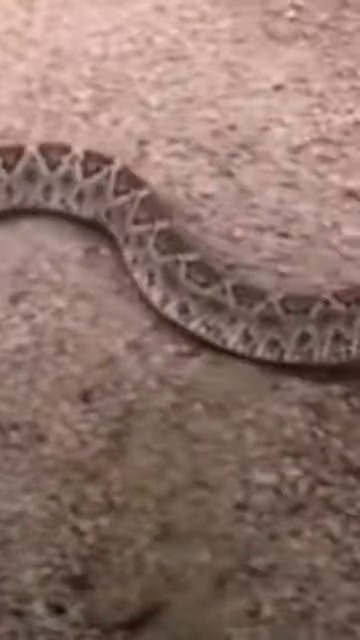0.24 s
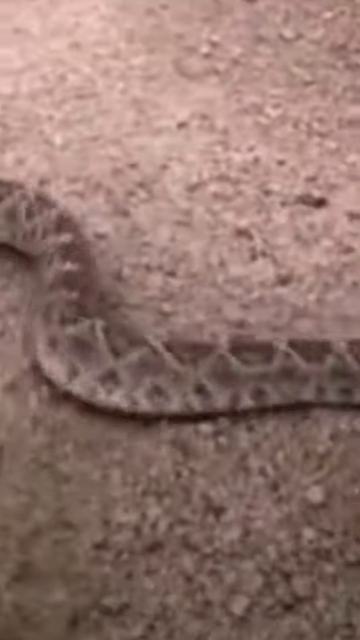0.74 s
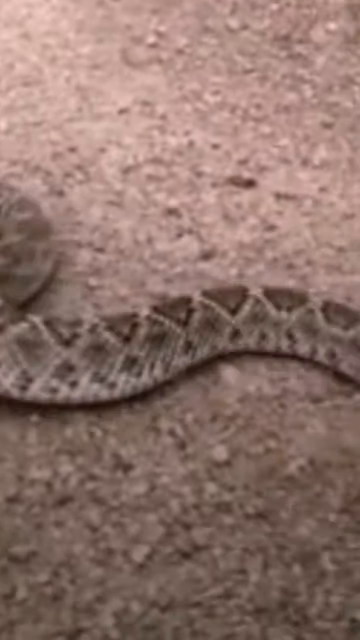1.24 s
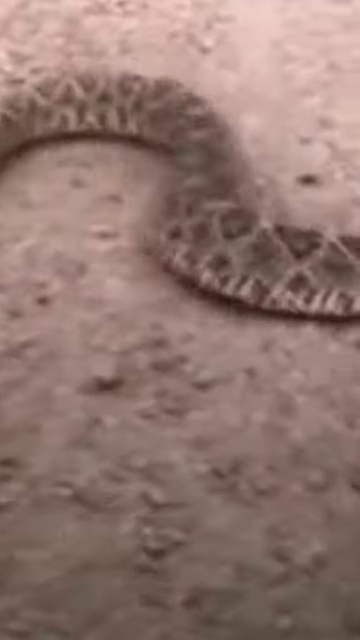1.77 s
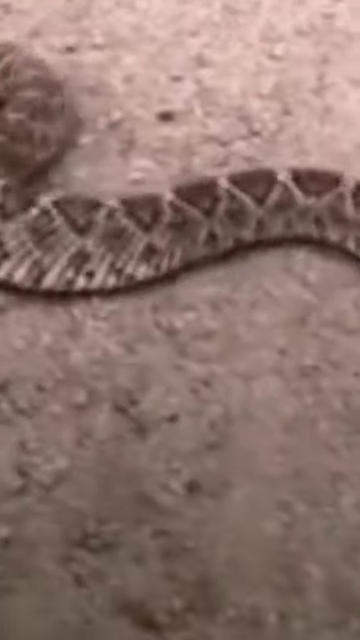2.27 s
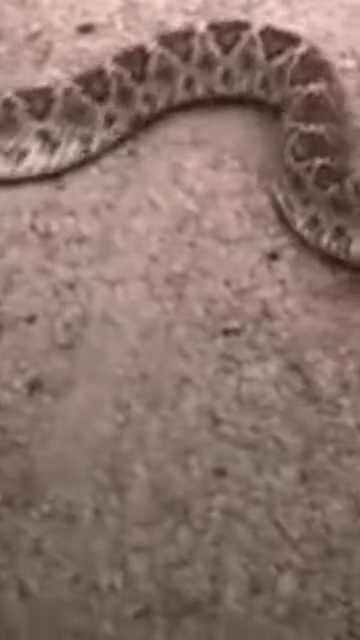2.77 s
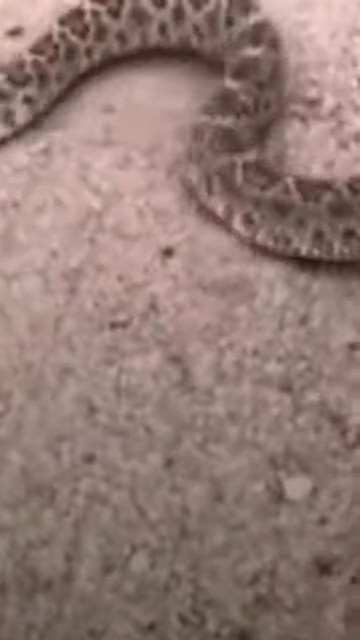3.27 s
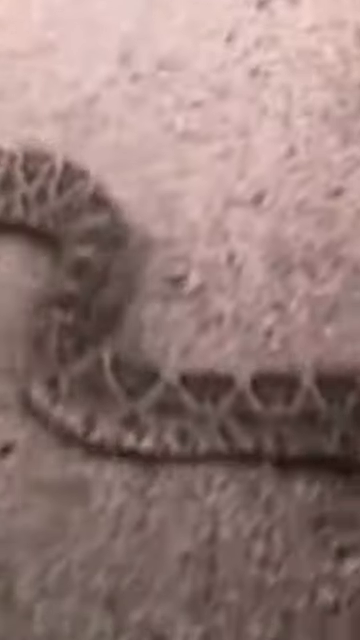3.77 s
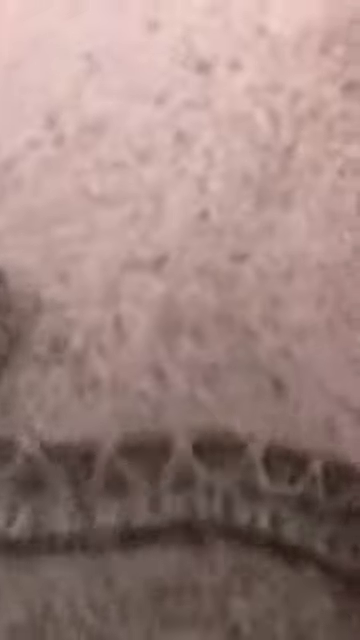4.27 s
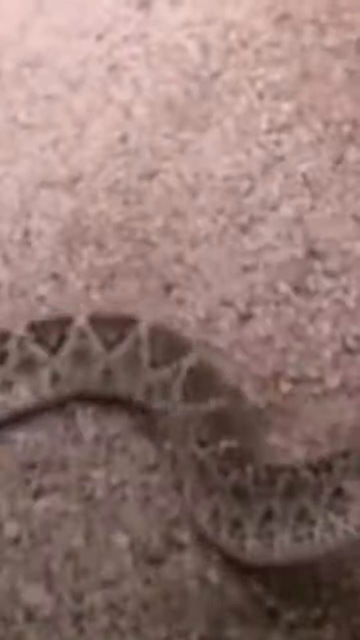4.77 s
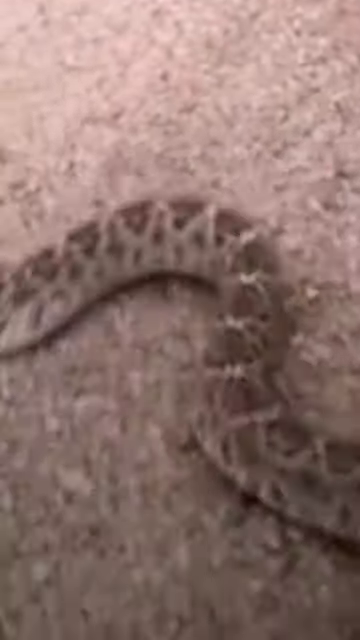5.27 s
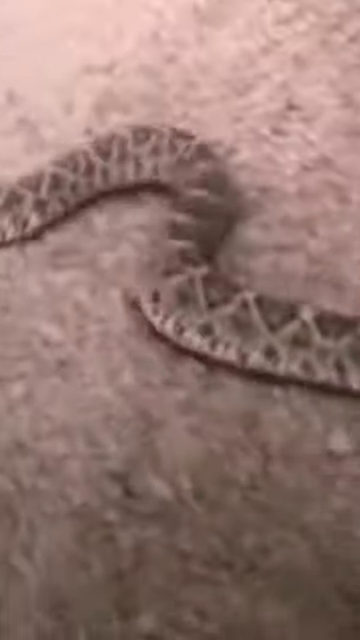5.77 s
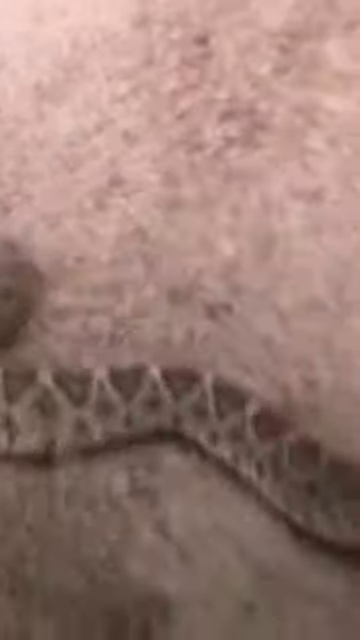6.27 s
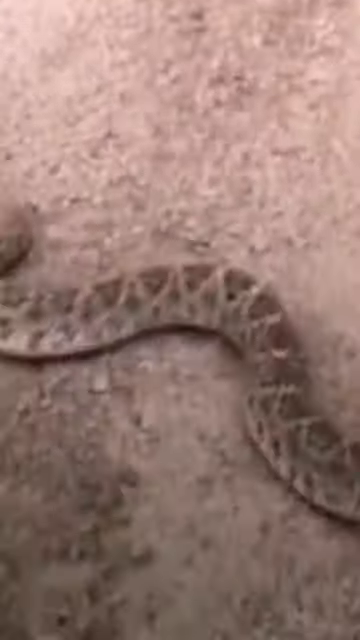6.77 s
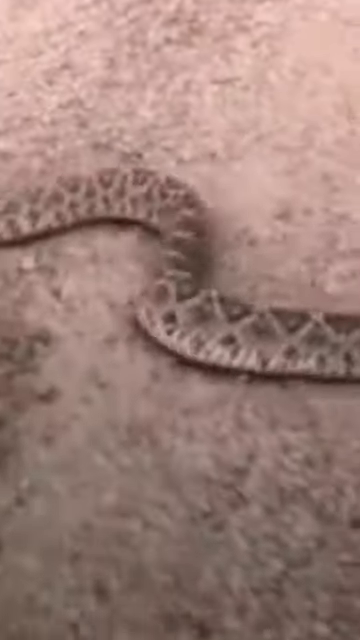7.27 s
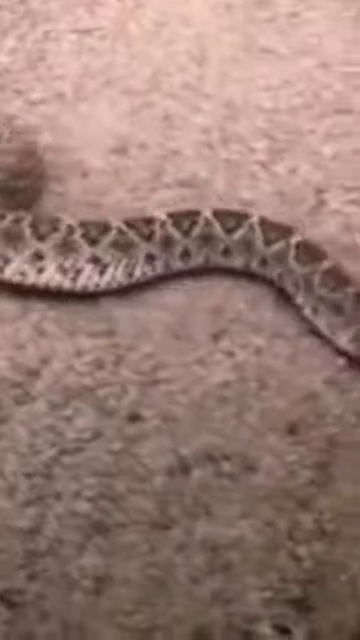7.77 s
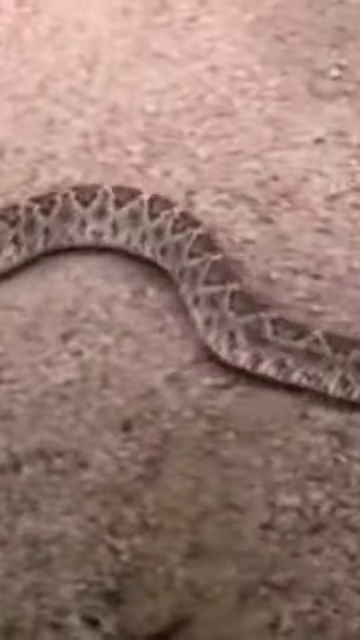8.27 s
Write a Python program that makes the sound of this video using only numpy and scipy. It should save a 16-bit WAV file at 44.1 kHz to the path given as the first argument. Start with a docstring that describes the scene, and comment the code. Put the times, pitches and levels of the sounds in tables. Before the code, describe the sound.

Outdoors on dry dirt, a bright, rapid rattlesnake buzz dominates from the first instant, its tone shifting as the tail turns. Beneath are lumpy wind rumble, a quiet low engine throb, soft scuffing and irregular gritty crunches with tiny stone ticks. Two hard cuts leave brief silences; the buzz is stronger between them. Near the end the opening sound repeats. Close, dry, centred sound, with wind thumping the microphone.

```python
"""A rattlesnake crawls over a dirt track: from the start its rattle buzzes, as loose horny segments
clash in bursts twice a swing and ring their hollow shells, modelled as clicks through resonances.
Behind it, filtered noise makes the wind and harmonics of the crank speed an idling engine; soon come
gravel crunches (dense clicks) and pebble knocks (decaying sines).
All sound cuts out near 1.7 s and 5.4 s, and from 7.6 s the opening sounds again like a loop."""
import sys
import numpy as np
from scipy import signal
from scipy.fft import rfft, irfft, next_fast_len
from scipy.io import wavfile
from scipy.ndimage import uniform_filter1d

SR = 44100
rng = np.random.default_rng(int(sys.argv[2]) if len(sys.argv) > 2 else 0)


def store_wav(level_fs):
    """Save 16-bit WAV to argv[1]."""
    pcm = np.round(np.clip(np.atleast_2d(level_fs), -1, 1) * 32767)
    wavfile.write(sys.argv[1], SR, pcm.T.astype(np.int16))


N = 375732
TIME = np.arange(N) / SR
EDGE_HZ = 15550  # upper band limit


def gain_of(db):
    """Logarithmic level: decibels to amplitude ratio."""
    return 10 ** (np.asarray(db) / 20)


def evened(x):
    """Power normalisation: scales to rms 1."""
    return x / np.sqrt(np.mean(x ** 2) + 1e-20)


def played(rows):
    """Linear interpolation: the columns of a (time, ...) table at every sample."""
    s, *columns = np.transpose(rows)
    return [np.interp(TIME, s, column) for column in columns]


def filtered(x, gain):
    """Zero-phase filtering: multiplies the spectrum by a gain that is a function of frequency."""
    size = next_fast_len(N + 4096)
    return irfft(rfft(x, size) * gain(np.fft.rfftfreq(size, 1 / SR)), size)[:N]


def coloured(x, points):
    """Spectral shaping: applies (frequency, dB) points on a log frequency axis, then evens to rms 1."""
    hz, db = np.transpose(points)
    return evened(filtered(x, lambda f: gain_of(np.interp(np.log(f + 1), np.log(hz), db))))


def band(x, lo_hz, hi_hz):
    """Band-pass filtering with steep tanh edges."""
    return filtered(x, lambda f: (np.tanh((f - lo_hz) / 70) - np.tanh((f - hi_hz) / 70)) / 2)


def drift(rate_hz):
    """Random modulation: noise under a Gaussian low-pass, at rms 1."""
    return evened(filtered(rng.standard_normal(N), lambda f: np.exp(-(f / rate_hz) ** 2)))


def clicks(per_s, spread_db):
    """Random impulse process: clicks of chance timing, sign and size."""
    hit = rng.random(N) < per_s / SR
    sign = rng.choice([-1., 1.], N)
    size_db = spread_db * np.clip(rng.standard_normal(N), -2.5, 2.5)
    return hit * sign * gain_of(size_db)


def resonances(x, modes):
    """Modal resonance: passes x through (frequency, width, dB) peaks with steep skirts."""
    def gain(f):
        power = sum(gain_of(db) ** 2 / (1 + 2 * ((f - hz) / width) ** 2) ** 3 for hz, width, db in modes)
        return np.sqrt(power)
    return filtered(x, gain)


def swept(x, gain):
    """Time-varying filtering: applies a gain that is a function of frequency and sample number."""
    hz, s, z = signal.stft(x, SR, nperseg=1024, noverlap=768)
    at = np.minimum(s * SR, N - 1).astype(int)
    return signal.istft(z * gain(hz[:, None], at), nperseg=1024, noverlap=768)[1][:N]


def shimmer(x, depth_db, width_hz, hold_s):
    """Spectral modulation: narrow dips come and go, shallower at 4.1-5.7 kHz and shallowest on top."""
    hz, _, z = signal.stft(x, SR, nperseg=2048, noverlap=1536)
    patches = rng.standard_normal(z.shape)
    spans = [max(1, round(width_hz * 2048 / SR)), max(1, round(hold_s * SR / 512))]
    for axis, span in enumerate(spans):
        for _ in range(2):
            patches = uniform_filter1d(patches, span, axis)
    depth_share = np.interp(hz, [3700, 4100, 5700, 6200, 8000, 11500], [1, .6, .6, 1, 1, .15])
    # rises are capped, so the dips stand out
    gain = gain_of(depth_db * depth_share[:, None] * np.minimum(evened(patches), .7))
    # even out the gain over a wider stretch of frequency
    gain /= np.sqrt(uniform_filter1d(gain ** 2, 10 * spans[0], axis=0))
    return signal.istft(z * gain, nperseg=2048, noverlap=1536)[1][:N]


# notches in the buzz: (centre before wander [Hz], width before widening [Hz])
NOTCHES = [(3520, 224), (4950, 120), (6450, 150), (7500, 100)]
WANDER_HZ, WANDER_RATE_HZ, WIDEN_DB = 114, 2.85, 6  # rms wander, its bandwidth, rms widening


def notches(hz, at):
    """Moving spectral notches: dips in the buzz that wander, widen and narrow at random."""
    gain = 1
    for centre, width in NOTCHES:
        offset = hz - centre - WANDER_HZ * drift(WANDER_RATE_HZ)[at]
        half_width = width * gain_of(WIDEN_DB * drift(WANDER_RATE_HZ)[at]) / 2
        gain = gain * offset ** 2 / (offset ** 2 + half_width ** 2)
    return gain


# the rattle as the tail turns, before RATTLE_DB: (time [s], sizzle level [dB],
# main ring against the sizzle [dB], second ring against the sizzle [dB])
RATTLE = [(0.02, -39.5, -1, 1), (0.17, -40.5, -4, 6.5), (0.45, -40, 1, -2), (0.75, -37.5, -0.5, -2.0),
          (0.97, -38.5, -2, -3.5), (1.15, -39, 5.5, 0.5), (1.55, -37.5, 1, -1.5), (2.1, -34.5, -2, 1.5),
          (2.5, -35, 1.0, -1.5), (2.85, -37, -2, 2.5), (3.25, -34, 0.5, -2), (3.75, -34, 0, -6.5),
          (4.4, -34, 3.0, 1), (5.1, -37.0, -1.5, 2), (5.36, -37, -0.5, 8), (5.6, -36, 1.5, 2),
          (5.87, -36, 5.5, -2.5), (6.15, -37.5, -1, -1.0), (6.45, -38.5, -2.5, 4.5),
          (7.0, -37.5, -0.5, -0.5), (7.2, -39, 5, -0.5), (7.6, -40.5, 0, 3.5)]
# level of the buzz between 6.3 and 8.9 kHz against the sizzle; it drops out briefly once: (time [s], level
# [dB])
UPPER = [(0.15, -5), (.45, -7), (2.3, -0.5), (3.05, -5), (3.3, -32), (3.55, -74), (3.75, -17), (3.9, -2),
         (5.3, 2.5), (5.9, -3.5), (6.5, 1.5), (7.5, -3.5)]
# hollow segments as resonators: (frequency [Hz], width [Hz], level [dB])
SHELL = [(2875, 606, -4.5), (4325, 1180, 1.5), (5397, 850, 7), (6740, 1620, 6.5), (8110, 1230, 1),
         (9520, 620, -11.5), (10270, 560, -8), (10670, 300, -6), (11920, 2400, -12), (15000, 3100, -11)]
# edges between the low, main, second and upper rings and the sizzle: (frequency [Hz])
RING_EDGES_HZ = [3600, 4950, 6300, 8900]
# the main ring slides a little as the segments shift: (time [s], offset [Hz])
SLIDE = [(2.3, -0.5), (3.2, 239), (3.8, 68), (4.4, -110), (5.8, -67), (6.6, 2)]
# the swing rate at the usual level; it falls a little as the level rises
SWINGS_PER_S, SWINGS_PER_DB, USUAL_DB = 71.8, -0.4, -38
TOGETHER = 0.078  # how closely the segments clash together, 0-1
RATTLE_DB, LOW_RING_SHARE = -0.5, 0.26


def rattle():
    """Impact excitation of resonators: two clash bursts a swing, one stronger, ring the hollow shells."""
    level_db, main_db, second_db = played(RATTLE)
    rings_db = main_db, second_db, played(UPPER)[0]
    swings = SWINGS_PER_S + SWINGS_PER_DB * (level_db - USUAL_DB)
    angle = 2 * np.pi * np.cumsum(swings * (1 + 0.015 * drift(12))) / SR
    stroke = np.cos(2 * angle) + 0.4 * np.cos(angle) + 0.45 * np.sin(4 * angle)
    force = np.exp(TOGETHER * stroke)
    clashes = shimmer(clicks(17000, spread_db=3.5), depth_db=12.5, width_hz=43, hold_s=0.13) * force
    ring = resonances(swept(clashes, notches), SHELL)

    # the sizzle follows the level alone; the lowest ring gives way when the second one swells
    sizzle = band(ring, RING_EDGES_HZ[-1], EDGE_HZ)
    low = gain_of(-LOW_RING_SHARE * second_db) * (ring - band(ring, RING_EDGES_HZ[0], SR))
    main, second, upper = (
        gain_of(db) * evened(band(ring, lo, hi))
        for lo, hi, db in zip(RING_EDGES_HZ, RING_EDGES_HZ[1:], rings_db))

    # single-sideband shift of the main ring
    slide = np.exp(2j * np.pi * np.cumsum(played(SLIDE)[0]) / SR)
    main = (signal.hilbert(main, next_fast_len(N))[:N] * slide).real
    return gain_of(level_db + RATTLE_DB) * ((low + sizzle) / sizzle.std() + main + second + upper)


# wind rumble at the microphone, before trim and drift: (time [s], level [dB])
WIND = [(0, -34.5), (.65, -32), (.85, -50), (1.5, -32.5), (2.05, -40), (2.3, -35), (2.85, -30), (3.1, -30),
        (3.65, -33.5), (3.9, -36.5), (5.75, -38.5), (6.15, -31.5), (6.9, -33), (7.6, -32)]
# spectrum of the rumble: (frequency [Hz], relative density [dB per Hz])
RUMBLE = [(18, -39.5), (29, -7.5), (38, -12.5), (48, 5.5), (100, 4.5), (145, -5), (200, -15.5), (400, -59)]
# rush of the gusts above the rumble, before trim and drift: (time [s], level [dB])
RUSH = [(0, -50.5), (2.1, -53.5), (2.2, -38), (2.9, -38.5), (3.07, -31), (3.68, -40), (3.85, -44),
        (5.35, -40.5), (6.15, -44), (6.5, -48.5), (7.6, -50)]
# spectrum of the gusts, before the moving edge: (frequency [Hz], relative density [dB per Hz])
GUST = [(70, -30), (115, 10), (180, 7.5), (270, -1.5), (550, -11.5)]
# upper edge of the rush: (time [s], frequency [Hz])
RUSH_EDGE = [(1.6, 400), (2.1, 287.7), (2.35, 383), (2.8, 318), (3.7, 588), (5.3, 576), (5.9, 377)]
# single buffets of air: (time [s], envelope peak [dB], pitch [Hz])
BUFFETS = [(.708, -18, 85), (3.06, -15, 60), (3.247, -18, 85), (4.889, -21.5, 85), (6.70, -15, 65),
           (6.931, -16, 62), (7.365, -19, 60)]


def wind():
    """Turbulent pressure noise: a lumpy rumble, the rush of gusts above it, and short buffets."""
    rumble_gain = gain_of(played(WIND)[0] - 1.5 + 2.6 * drift(23))
    rumble = rumble_gain * coloured(rng.standard_normal(N), RUMBLE)

    edge_hz = played(RUSH_EDGE)[0]
    gusts = coloured(rng.standard_normal(N), GUST)
    gusts = swept(gusts, lambda hz, at: 1 / np.hypot(1, (hz / edge_hz[at]) ** 14))
    rush = gain_of(played(RUSH)[0] + 7.0 + 3.3 * drift(22)) * gusts

    buffets = np.zeros(N)
    for s, db, hz in BUFFETS:
        envelope = gain_of(db - ((TIME - s) / 0.0031) ** 2)
        buffets += envelope * np.sin(2 * np.pi * (hz * TIME + rng.random()))
    return rumble + rush + buffets


# stretches of sound: (start [s], end [s], fade-in [s], time of one engine beat [s])
BOUTS = [(0, 1.655, .004, 1.151), (1.985, 5.407, .015, 3.059), (5.558, 8.53, .003, 6.696)]
# throb of the idling engine: (multiple of the crank speed, rms level before drift and ENGINE [dB])
IDLE = [(3, -49.5), (4, -37), (5, -41), (6, -49)]
# hum of the engine: (frequency [Hz], rms level before drift and ENGINE [dB])
HUM = [(161.3, -47), (167.5, -49)]
# drone of the engine's body: (frequency [Hz], width [Hz], relative level [dB])
DRONE = [(173.8, 22.8, 2.5), (307, 109, -9), (506, 135, -15)]
# the engine fades away for a while: (time [s], throb gain [dB], hum and drone gain [dB])
ENGINE = [(1.6, -2, 2.5), (2.05, -13, -7), (3.4, -5, -9), (3.7, -6.5, 4.5), (5.7, -5, 2), (6.25, 1, 2)]
CRANK_HZ = 16.1


def engine():
    """Harmonic superposition: crank orders align once a turn, under a wavering hum and a body drone."""
    starts, _, _, beats = np.transpose(BOUTS)
    beat = beats[np.searchsorted(starts, TIME, "right") - 1]
    angle = 2 * np.pi * CRANK_HZ * (TIME - beat)
    throb = sum(gain_of(db + 2 * drift(5)) * np.cos(k * angle) for k, db in IDLE)
    hum = np.zeros(N)
    for hz, db in HUM:
        hum += gain_of(db + 2 * drift(4.6)) * np.sin(2 * np.pi * hz * TIME + .5 * drift(1.9))
    drone = gain_of(-43.5) * evened(resonances(rng.standard_normal(N), DRONE))
    throb_db, hum_db = played(ENGINE)
    # sqrt(2) turns rms into sine amplitude
    return np.sqrt(2) * gain_of(throb_db) * throb + gain_of(hum_db) * (np.sqrt(2) * hum + drone)


# gravel crunches: (time [s], peak before CRUNCH_DB [dB], weight of the thud before THUD_DB [dB],
# decay time [s])
CRUNCHES = [(0.099, -38.5, -8, 0.0034), (0.298, -32.5, -9, 0.008), (0.415, -32, -18, 0.0062),
            (0.659, -41, -1, 0.005), (0.92, -31, -10, 0.0087), (1.21, -40, 5, 0.0057),
            (1.379, -36.5, -3, 0.0044), (2.155, -31.5, -15, 0.011), (2.277, -30, -11, 0.011),
            (2.913, -33.5, -32, 0.015), (2.993, -31.5, -4, 0.005), (3.314, -31, -20, 0.0067),
            (3.706, -28, -24, 0.0084), (3.749, -32.5, -25, 0.013), (4.811, -38, -14, .005),
            (5.006, -37, 0, 0.0039), (5.044, -36, -3, 0.0052), (5.601, -30.5, -19, 0.016),
            (5.789, -29, -14, 0.01), (5.812, -33, 2.5, 0.0069), (6.132, -33.5, -10, 0.011),
            (6.191, -29.5, -5, 0.0095), (6.393, -28.5, -33, 0.025), (6.752, -29, -36, 0.0059)]
# spectrum of the grains: (frequency [Hz], relative density [dB per Hz])
GRAVEL = [(200, -26), (500, -12.5), (900, -3.5), (1300, -1.5), (1900, 1), (2500, -4.5), (4000, -5.5),
          (9000, -17)]
# soft scuffing over the dirt, before trim and drift: (time [s], level [dB])
SCUFF = [(0, -48.5), (.9, -44.5), (1.55, -50.5), (2.03, -46.5), (2.17, -43), (2.45, -46.5), (2.8, -49.5),
         (2.95, -44), (4.8, -46.5), (6.2, -43.5), (6.6, -47), (7.6, -46)]
# spectrum of the scuffed dirt: (frequency [Hz], relative density [dB per Hz])
DIRT = [(400, -37), (680, -1.5), (900, 0.5), (1300, -4), (2100, -6), (4000, 0), (9000, -57.5)]
CRUNCH_DB, CRUNCH_RISE = -2, 0.18  # rise time as a share of the decay time
SCRAPE_DB, SCRAPE_S = -11, 0.038  # scrape against its crunch, Gaussian half-length
GRIT_DB, GRIT_RATE_HZ = 0.5, 340  # rms unevenness of the spill, its bandwidth
THUD_DB, THUD_HZ, THUD_WIDTH_HZ = 1.5, 602, 930  # the packed ground under the grains


def gravel():
    """Granular impact noise: uneven spills inside softer scrapes, over dull thuds and soft scuffing."""
    spill, thud = np.zeros((2, N))
    for s, db, thud_db, length in CRUNCHES:
        near = abs(TIME - s) < .2
        age = TIME[near] - s
        burst = np.exp(-np.maximum(age, -age / CRUNCH_RISE) / max(length, .001))
        scrape = gain_of(SCRAPE_DB) * np.exp(-(age / SCRAPE_S) ** 2)
        crunch = gain_of(db + CRUNCH_DB) * np.hypot(burst, scrape)
        spill[near] += crunch
        thud[near] += gain_of(thud_db + THUD_DB) * crunch
    spill *= evened(gain_of(GRIT_DB * drift(GRIT_RATE_HZ)))
    grains = coloured(clicks(12000, spread_db=3.0), GRAVEL)
    grains = shimmer(grains, depth_db=8.5, width_hz=230, hold_s=.08)
    ground = evened(resonances(rng.standard_normal(N), [(THUD_HZ, THUD_WIDTH_HZ, 0)]))

    dirt = coloured(rng.standard_normal(N), DIRT)
    dirt = shimmer(dirt, depth_db=4.5, width_hz=130, hold_s=.06)
    scuff_db = played(SCUFF)[0] + 1.5 + 1.6 * np.tanh(drift(17)) + 1.6 * np.tanh(drift(70))
    return spill * grains + thud * ground + gain_of(scuff_db) * dirt


# sharp knocks of pebbles: (time [s], level of each mode before the band-pass [dB])
KNOCKS = [(0.43, -29.5), (3.8, -32.5), (5.007, -30.5), (5.048, -30.5), (5.606, -29), (5.879, -31),
          (6.193, -21), (6.752, -32)]
# modes before the random spread, spread as a share of the pitch, time to fall by 60 dB
PEBBLE_HZ, PEBBLE_SPREAD, PEBBLE_T60_S = [965, 1400, 1840], 0.086, 0.016


def pebbles():
    """Damped modal vibration: pebbles knock and ring very briefly, each at pitches of its own."""
    out = np.zeros(N)
    for s, db in KNOCKS:
        near = (TIME >= s) & (TIME < s + .05)
        age = TIME[near] - s
        for hz in PEBBLE_HZ:
            turns = hz * (1 + PEBBLE_SPREAD * rng.uniform(-1, 1)) * age + rng.random()
            out[near] += gain_of(db - 60 * age / PEBBLE_T60_S) * np.sin(2 * np.pi * turns)
    return band(out, 300, 3500)


LOOP_S = 7.602


def scene():
    """Linear superposition, alike in both channels; an equal-power crossfade at LOOP_S starts it over."""
    sound = rattle() + wind() + engine() + gravel() + pebbles()
    again = np.clip((TIME - LOOP_S) / .01, 0, 1)
    looped = np.sqrt(1 - again) * sound + np.sqrt(again) * np.roll(sound, round(LOOP_S * SR))
    return np.tile(looped, (2, 1))


def record(dry):
    """Gating and band limiting: sound cuts in and out with a very short tail, then a low-pass."""
    gate = np.zeros(N)
    for start, end, fade_in, _ in BOUTS:
        # drops by 11.5 dB at once, then falls at 1700 dB/s
        tail = gain_of(-11.5 - 1700 * np.maximum(TIME - end, 0))
        gate += np.clip((TIME - start) / fade_in, 0, 1) * np.where(TIME < end, 1, tail)
    low_pass = signal.firwin(1023, EDGE_HZ, window=("kaiser", 9), fs=SR)
    return signal.oaconvolve(dry * gate, low_pass[None], "same")


dry = scene()
out = record(dry)
store_wav(out)
```